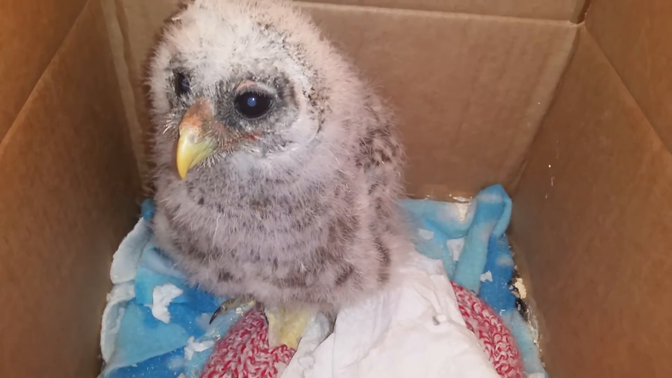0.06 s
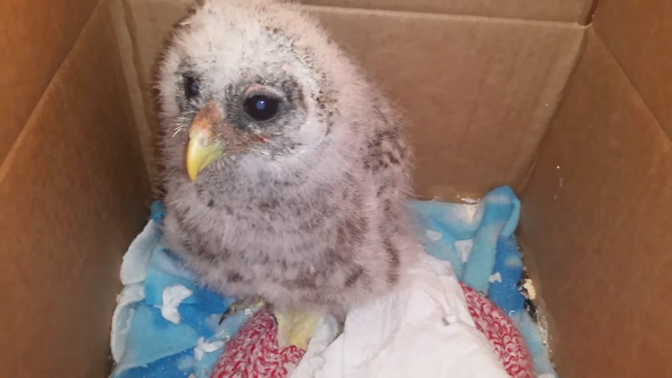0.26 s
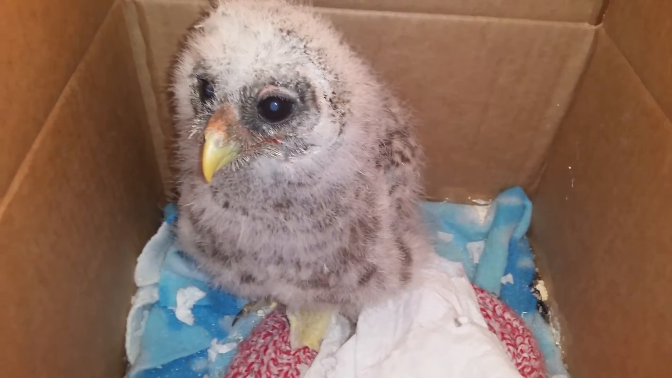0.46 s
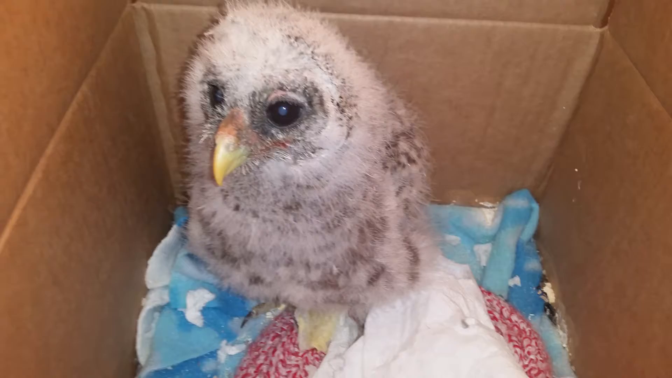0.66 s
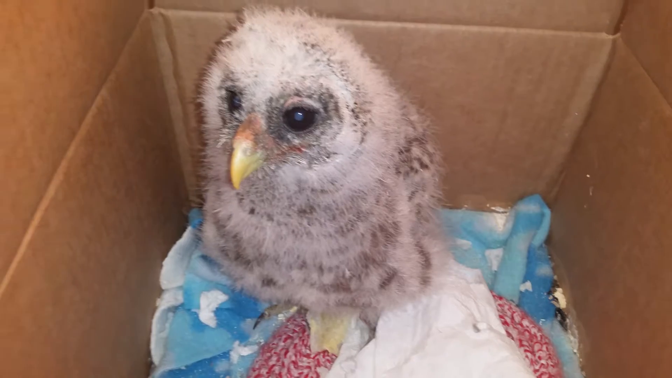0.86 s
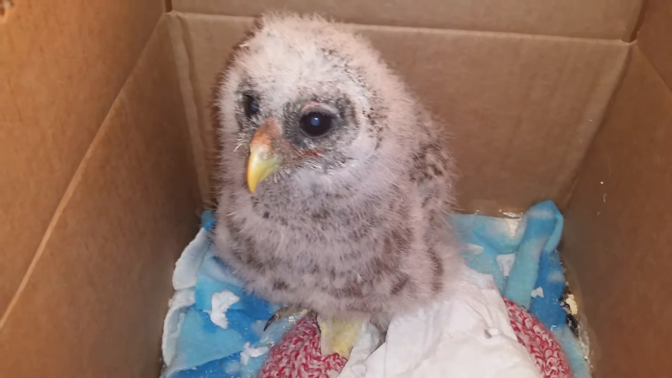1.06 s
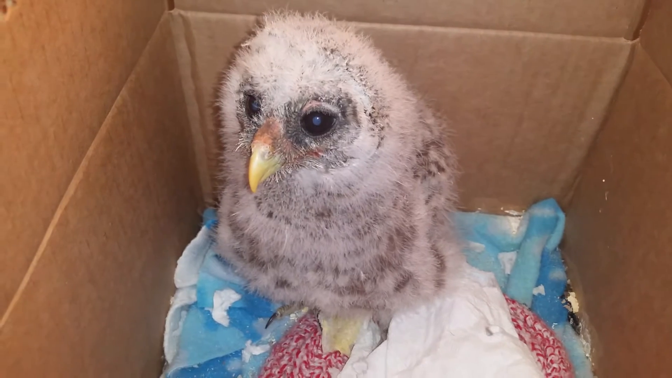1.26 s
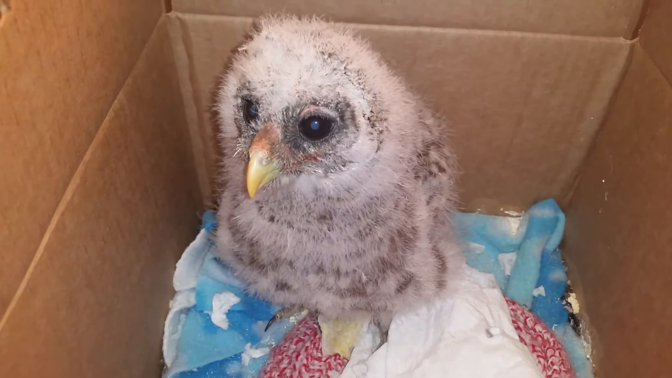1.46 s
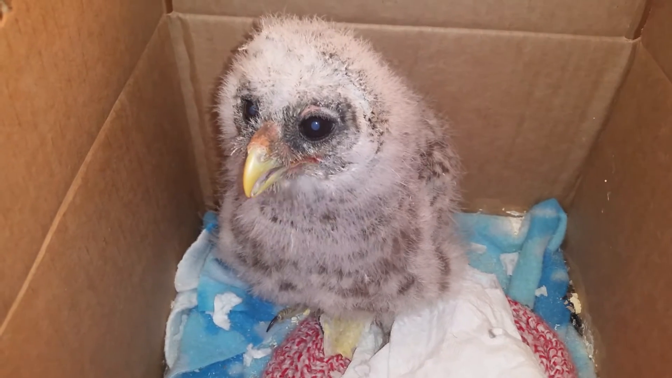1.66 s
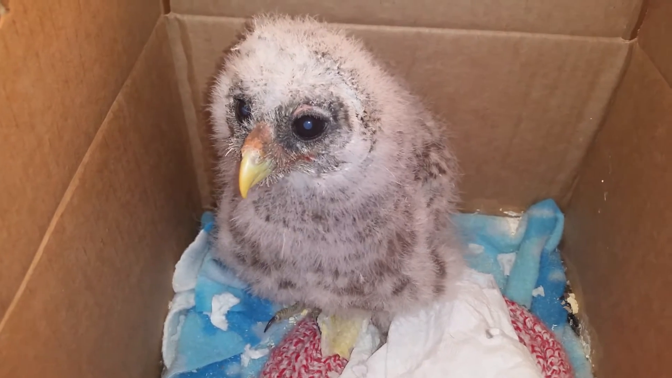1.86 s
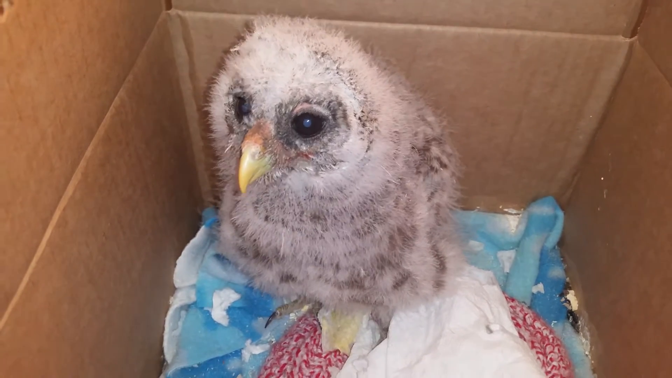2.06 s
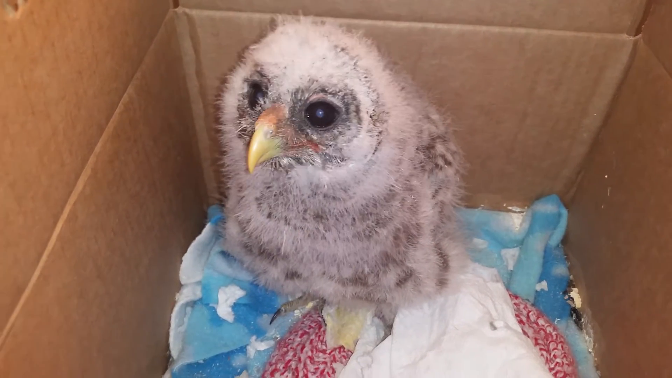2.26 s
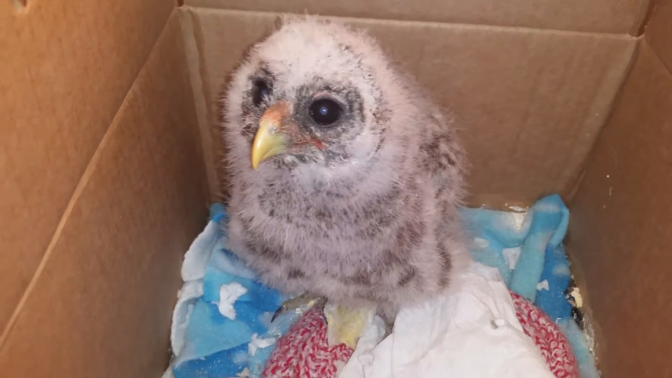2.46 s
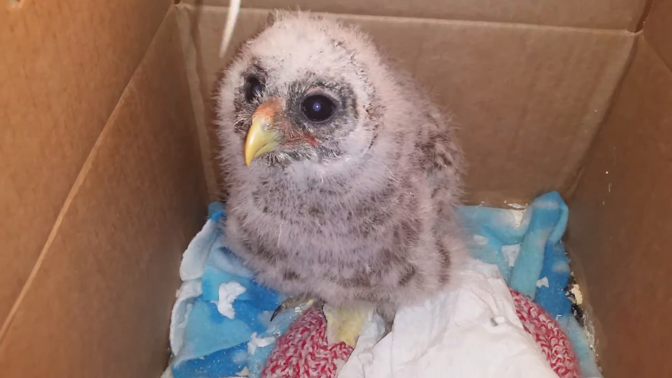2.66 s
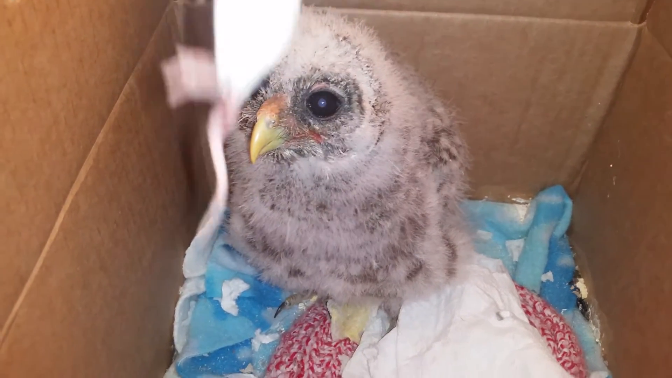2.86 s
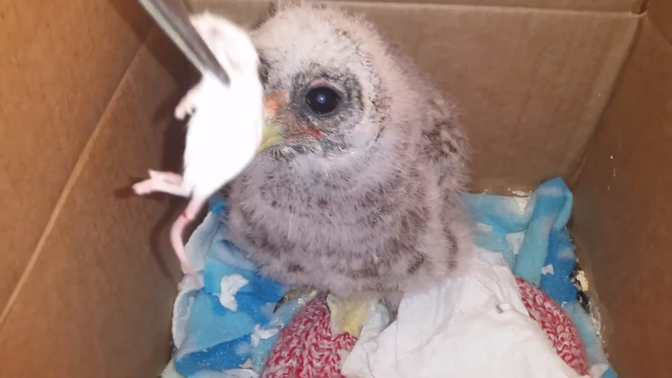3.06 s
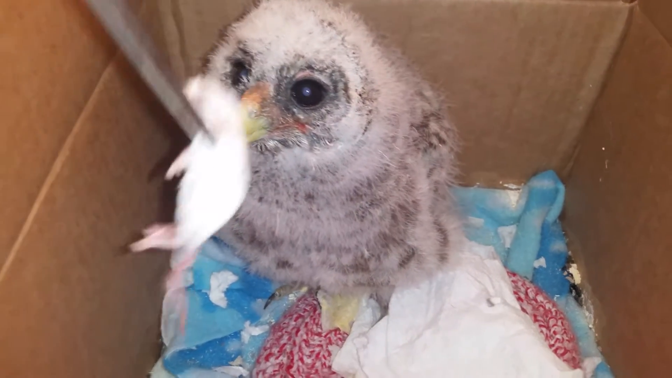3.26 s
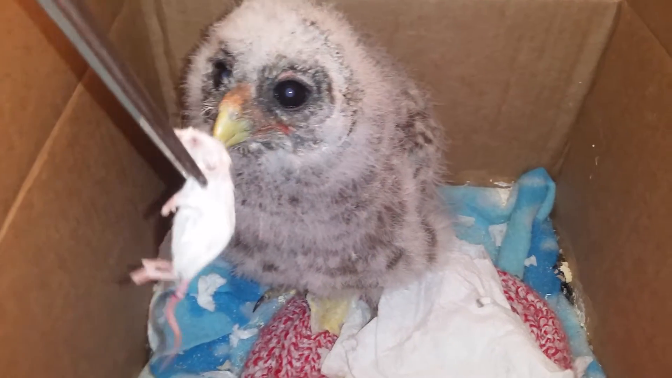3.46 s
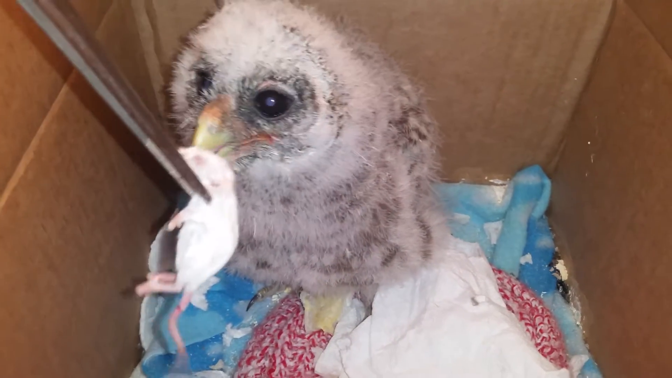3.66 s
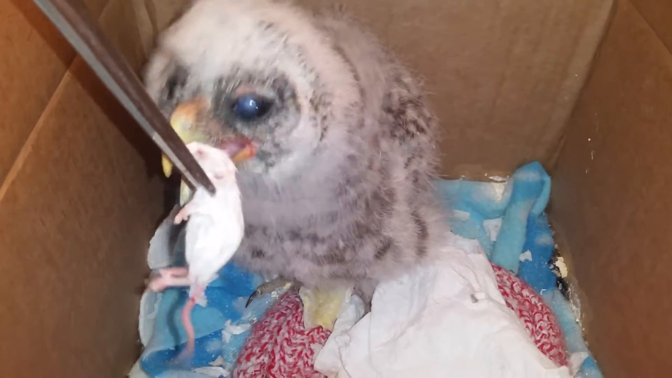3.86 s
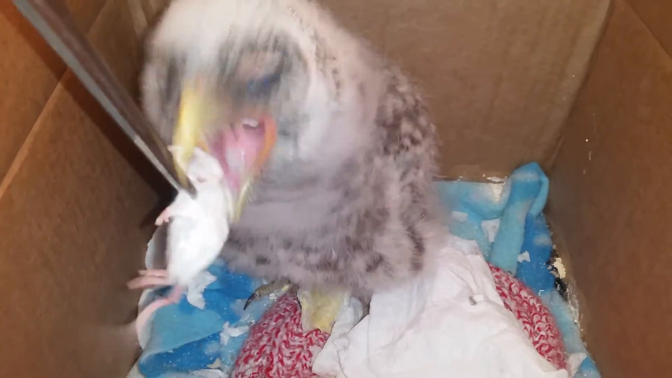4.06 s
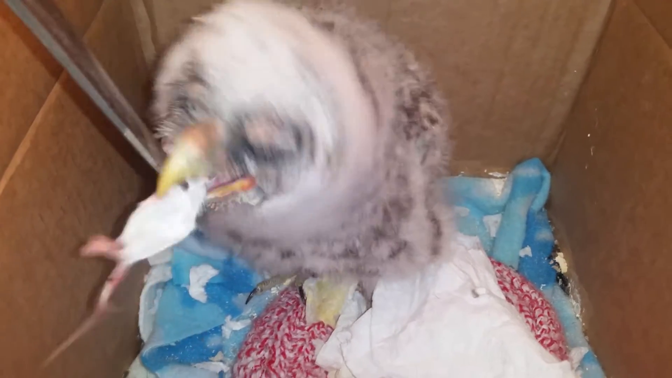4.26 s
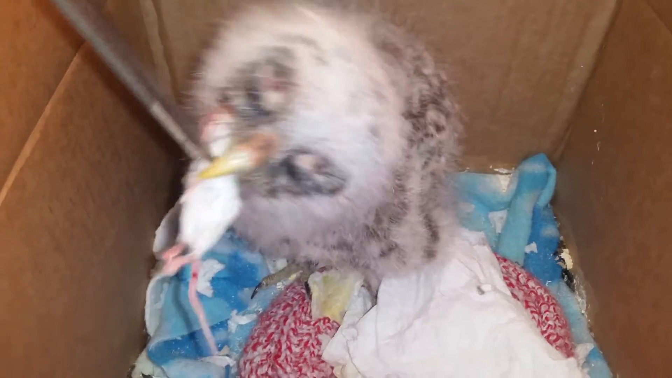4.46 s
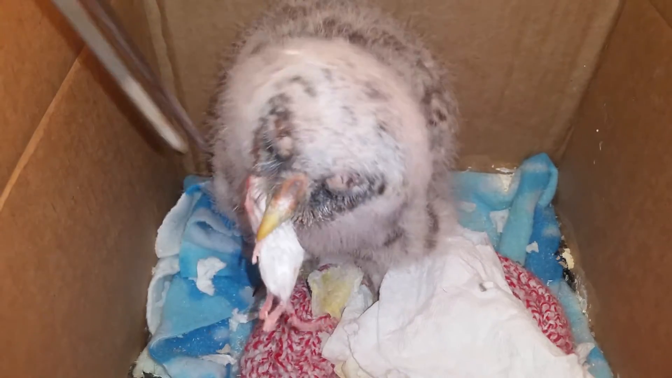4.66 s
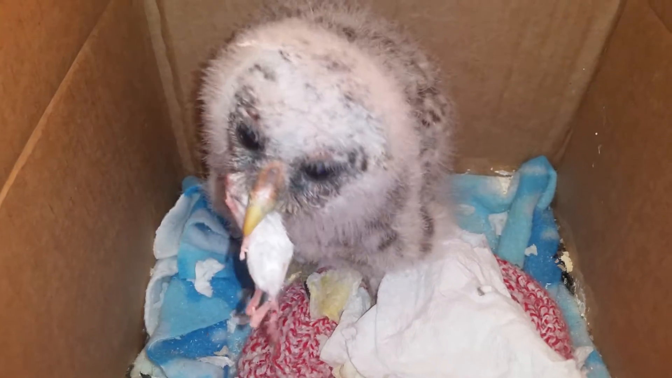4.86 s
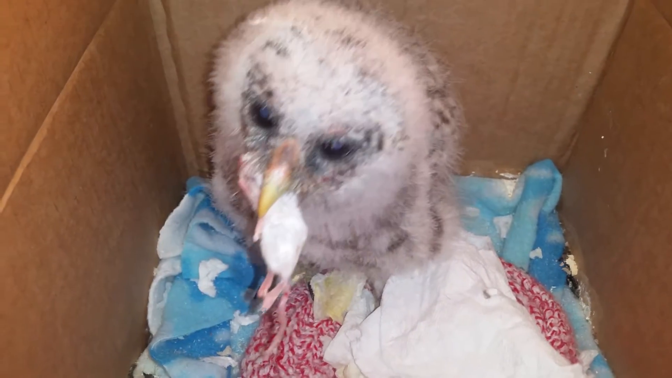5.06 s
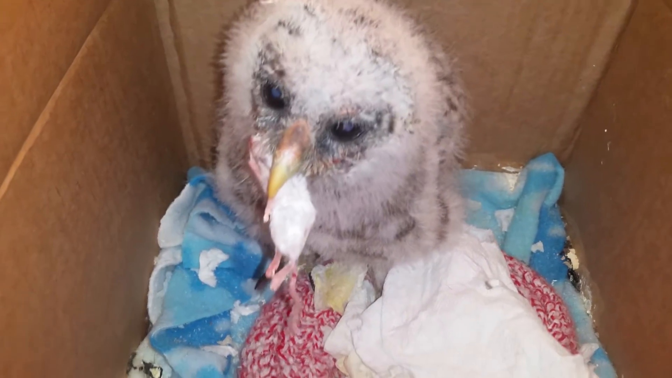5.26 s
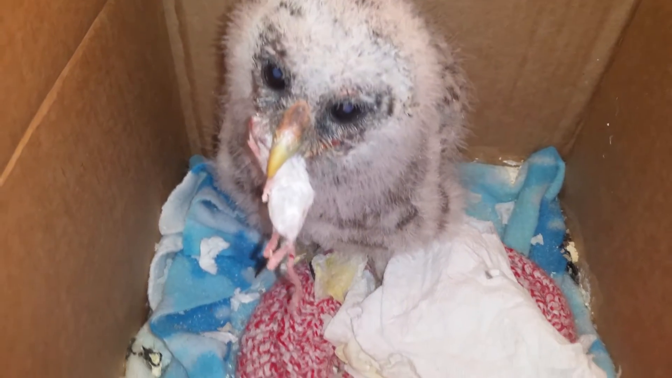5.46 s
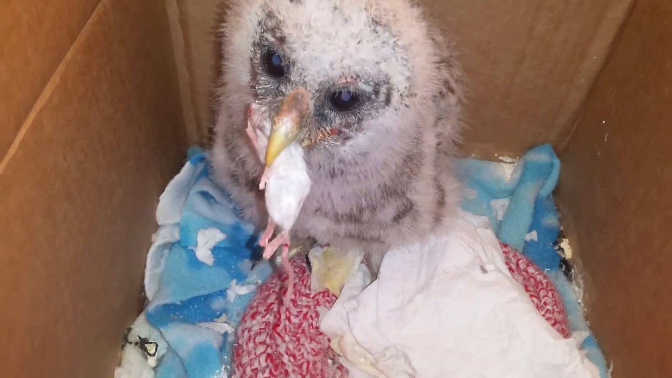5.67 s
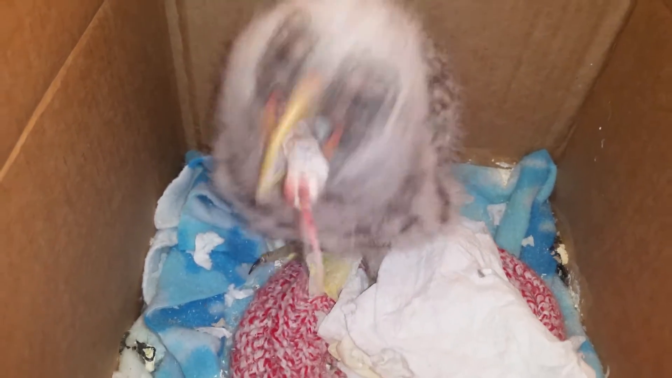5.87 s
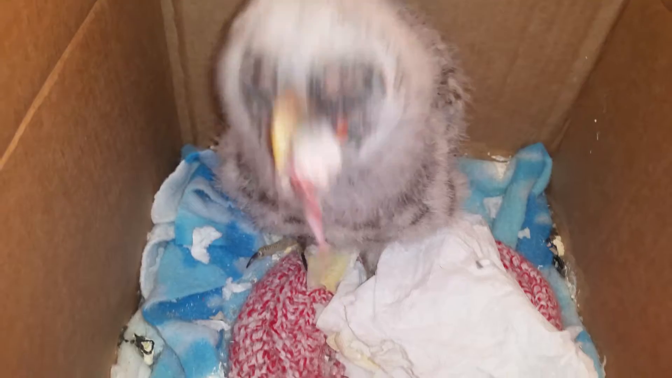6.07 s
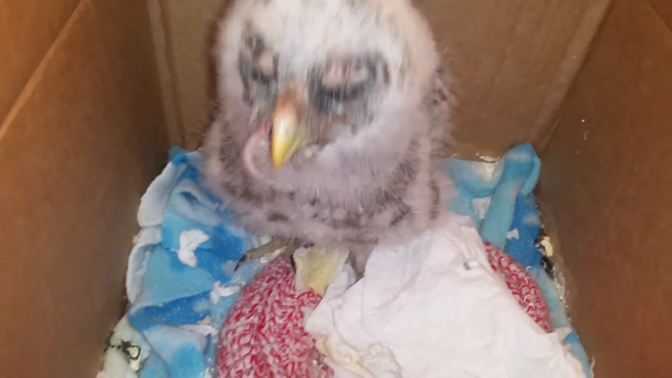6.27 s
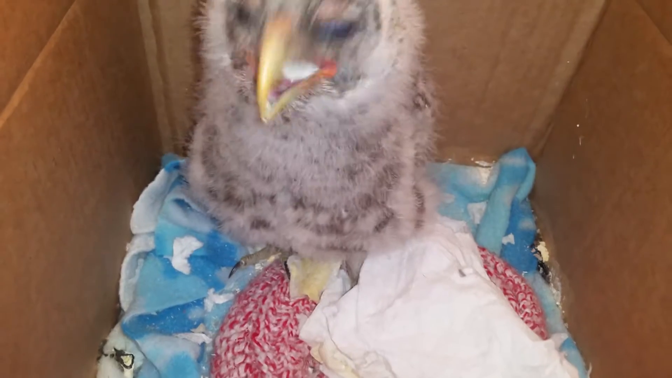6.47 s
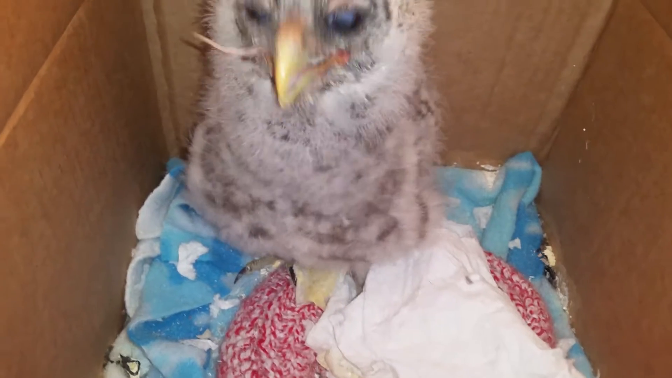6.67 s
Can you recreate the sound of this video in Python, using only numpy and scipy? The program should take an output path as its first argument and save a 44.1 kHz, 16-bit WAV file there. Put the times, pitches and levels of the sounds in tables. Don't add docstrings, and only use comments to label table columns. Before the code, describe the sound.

Close in a cardboard box, a young owl gives one weak wheezy whistle and one loud tearing shriek, with dull thuds, rustles and ticks.

```python
import sys
import numpy as np
from scipy import signal
from scipy.fft import rfft, irfft, next_fast_len
from scipy.io import wavfile
from scipy.ndimage import uniform_filter1d

SR = 44100
rng = np.random.default_rng(int(sys.argv[2]) if len(sys.argv) > 2 else 0)


def transcribe(signal):
    frames = np.atleast_2d(signal).T
    limited = np.clip(frames, -1, 1)
    pcm = np.round(limited * 32767).astype(np.int16)
    wavfile.write(sys.argv[1], SR, pcm)


def voltage_ratio(decibels):
    exponent = np.asarray(decibels, float) / 20
    return 10 ** exponent


N = 296087
T = np.arange(N) / SR
M = next_fast_len(N)
HZ = np.maximum(np.arange(M // 2 + 1) * SR / M, 1)
PORT_LAG_S = 5.6 / 44100


def unit(x):
    return x / np.sqrt(np.mean(np.abs(x) ** 2))


def pan(left_minus_right_db):
    return voltage_ratio(np.array([[left_minus_right_db], [-left_minus_right_db]]) / 2)


def curve(rows, fade_s=.004):
    s, *columns = np.transpose(rows)
    on = np.clip(np.minimum(T - s[0], s[-1] - T) / fade_s + 1, 0, 1)
    return [np.interp(T, s, c) for c in columns], on


def walk(rate):
    k = int(SR / rate)
    return unit(uniform_filter1d(uniform_filter1d(rng.standard_normal(N), k), k))


def colour(x, table, lo_hz=1, hi_hz=30000):
    hz, *db = np.transpose(table)
    gain = voltage_ratio(np.array([np.interp(np.log(HZ), np.log(hz), d) for d in db]))
    band = 1 / np.sqrt((1 + (lo_hz / HZ) ** 12) * (1 + (HZ / hi_hz) ** 12))
    return irfft(rfft(x, M) * gain * band, M)[..., :N]


def ports(alike_hz, lag_s=0., most=0.21):
    common = rfft(rng.standard_normal(N), M)
    own = rfft(rng.standard_normal((2, N)), M)
    alike = min(most, 1) / (1 + (HZ / alike_hz) ** 2)
    late = np.exp(-2j * np.pi * HZ * lag_s * np.array([[0], [1]]))
    return irfft(np.sqrt(alike) * common * late + np.sqrt(1 - alike) * own, M)[:, :N]


def streaks(x, depth_db, hold_s):
    _, _, z = signal.stft(x, nperseg=256)
    field = uniform_filter1d(rng.standard_normal(z.shape[1:]), int(hold_s * SR / 128), axis=1)
    return signal.istft(z * voltage_ratio(depth_db * unit(field)), nperseg=256)[1][:, :N]


def membrane(rows, lead, rough, jitter_hz, chaos_hz, chaos_db=0.):
    (hz, db, pan_db), on = curve(rows, 0.0022)
    chaos = unit(walk(chaos_hz) + 1j * walk(chaos_hz))
    beat = np.sqrt(1 - rough) + np.sqrt(rough) * voltage_ratio(chaos_db) * chaos
    phasor = on * beat * np.exp(2j * np.pi * np.cumsum(hz + jitter_hz * walk(148.0)) / SR)
    port = np.array([[.5], [-.5]])
    return phasor, np.sqrt(2) * voltage_ratio(db + port * pan_db + 1.06) * np.exp(1j * port * lead)


def times(z, k):
    return np.exp(1j * k * np.angle(z))


# (time [s], pitch [Hz], level [dB], left minus right [dB])
LOW_MEMBRANE = [
    [(1.83, 3850, -50.5, -14), (1.85, 4390, -48, -8), (1.88, 4690, -49, -4), (1.94, 4550, -47.5, -5),
     (2.005, 4590, -40.5, -5), (2.045, 4640, -48.5, -9), (2.17, 4640, -46.5, -2), (2.3, 4640, -59, 7),
     (2.585, 4620, -67, 23)],
    [(4.2155, 4116, -19, 4), (4.228, 4234, -23.5, 7), (4.245, 4300, -22, -5), (4.262, 4330, -23, 9),
     (4.28, 4394, -30.5, 16), (4.3, 4394, -18.5, 8), (4.32, 4120, -22, 1), (4.338, 4030, -19, -1)],
    [(4.37, 4070, -19.5, 1), (4.39, 4245, -17, -4.5), (4.41, 4184, -19.5, -6), (4.43, 4224, -21, -3),
     (4.455, 4202, -18, -9), (4.476, 4280, -16, -11), (4.495, 4143, -16.5, -10), (4.512, 4270, -16.5, -7.5)],
    [(4.535, 4777, -35.5, -8.5), (4.65, 4760, -35, 12), (4.72, 4850, -33, 5.5), (4.76, 5030, -30.5, 2),
     (4.8, 4920, -32.5, 4), (4.9, 4980, -33.5, 3), (4.945, 4620, -31.5, 3.5), (4.97, 4170, -38.5, -2.5)],
]
# (time [s], pitch [Hz], level [dB], left minus right [dB])
HIGH_IN_FIRST = [
    [(1.85, 5600, -58, -4), (1.878, 5820, -53, -9), (1.926, 5630, -45.5, -2), (2.014, 5650, -38, 1.5),
     (2.086, 5560, -47, 4), (2.13, 5640, -42, 1), (2.21, 5496, -46.5, 4)],
    [(2.23, 5500, -47, 6), (2.27, 5610, -39.5, -3), (2.3, 5630, -42.5, 3), (2.358, 5680, -38.5, 0),
     (2.396, 5810, -38.5, 3), (2.412, 5735, -37.5, -1), (2.558, 5580, -44, 0.5), (2.58, 5390, -51, -1.0),
     (2.592, 5260, -50, 1)],
]
# (time [s], pitch [Hz], level [dB], left minus right [dB])
HIGH_IN_SECOND = [
    [(4.23, 5470, -36, 4), (4.27, 5600, -39, 21), (4.335, 5324, -32.5, 19), (4.37, 5346, -31, 11),
     (4.405, 5470, -33, 20), (4.432, 5260, -39, 10), (4.48, 5380, -27, 13), (4.52, 5370, -32.5, 17)],
    [(4.56, 5340, -33.5, 18.5), (4.62, 5476, -27, 19.5), (4.67, 5910, -28, 16), (4.705, 5986, -32, 19.5),
     (4.725, 5890, -35, 17), (4.76, 5935, -31, 11), (4.8, 5960, -24, 6.5)],
    [(4.822, 6050, -23, 1), (4.84, 6120, -28, 3), (4.86, 6130, -28, 2), (4.885, 6146, -25, 7.5),
     (4.907, 6250, -22, 4.5), (4.928, 6156, -25, 12), (4.935, 5890, -33, 9), (4.95, 5690, -33.5, 5),
     (4.966, 5100, -34, 1)],
]
# (time [s], pitch [Hz], level [dB], left minus right [dB])
SIDE_MEMBRANES = [
    [(4.231, 4490, -29.5, 12), (4.26, 4685, -34, 11), (4.3, 4580, -34, 16), (4.35, 4396, -24.5, -1),
     (4.38, 4430, -26, -1), (4.43, 4540, -29, -1), (4.465, 4500, -30, 1)],
    [(4.64, 6000, -40, 7), (4.67, 6640, -32.5, 6), (4.71, 6600, -30.5, 7), (4.745, 6460, -29.5, 4),
     (4.83, 6640, -34.5, 6), (4.845, 6680, -34, -2)],
    [(2.602, 9650, -51, -1), (2.624, 8650, -48, 17), (2.642, 7840, -66, 12)],
    [(4.522, 4350, -24, -5), (4.545, 4326, -26, -1), (4.63, 4330, -36, 6)],
    [(4.2045, 4250, -32, 10), (4.208, 4200, -36, 4), (4.2115, 4300, -33, 13)],
    [(4.7, 1060, -57.5, 1), (4.88, 1055, -41.5, 4), (4.955, 1096, -52.5, 2)],
    [(2.592, 5240, -54, -4), (2.608, 4750, -57, -8), (2.63, 4300, -56, -12), (2.646, 3900, -58, -14)],
    [(2.608, 4100, -55, -13), (2.634, 3800, -56, -10)],
    [(4.925, 4990, -40, 4), (4.948, 5180, -28, 5), (4.96, 4630, -31, 4)],
    [(4.85, 6660, -33, 5), (4.92, 6600, -35, 0)],
    [(4.52, 6000, -39, 7), (4.63, 5915, -46, 5)],
    [(4.51, 2800, -38, 3), (4.69, 2780, -47, -12)],
    [(1.86, 3500, -53.5, -9), (1.99, 3620, -47, -5), (2.26, 3630, -55, -5)],
    [(1.86, 3990, -46, -5), (2.1, 4050, -57, 0), (2.56, 3880, -57, 3)],
]
FLUTTER, WHISTLE, SQUEAK, UNDERTONE, CATCH, GROWL = SIDE_MEMBRANES[:6]
GLIDES, HOARSE = SIDE_MEMBRANES[6:9], SIDE_MEMBRANES[9:]
# (time [s], roughness [0-1])
ROUGHNESS = [
    [(1.83, .02), (1.9, .16), (2.03, .18), (2.2, .3), (2.3, .85), (2.57, .85), (2.6, .05)],
    [(4.51, .003), (4.53, .2), (4.62, .55), (4.7, .5), (4.76, .4), (4.79, .88), (4.93, .9), (4.95, .3)],
]
# (time [s], left lead of the low membrane [rad], of the high one [rad])
HEAD_TURNS = [
    [(1.9, 1.3, .3), (2.2, 1.3, .1), (2.27, 0., 0.), (2.45, .1, -.2), (2.55, 3., .2)],
    [(4.21, .9, .5), (4.26, -.2, 1.2), (4.34, 1.2, -1.2), (4.4, .1, -1.3), (4.5, .6, -1.6),
     (4.535, -1.2, -2.5), (4.62, -1.2, -5.2), (4.74, -1.2, -4.1), (4.9, -1.2, -1.6)],
]
BEAT_SLIPS = [4.4685, 4.482, 4.5113, 4.5165]


def screech(k):
    rough = np.clip(curve(ROUGHNESS[k])[0][0], 0, 1)
    low_lead, high_lead = curve(HEAD_TURNS[k])[0]
    low_rows = (LOW_MEMBRANE[0], LOW_MEMBRANE[1] + LOW_MEMBRANE[2] + LOW_MEMBRANE[3])[k]
    high_rows = (HIGH_IN_FIRST[0] + HIGH_IN_FIRST[1],
                 HIGH_IN_SECOND[0] + HIGH_IN_SECOND[1] + HIGH_IN_SECOND[2])[k]
    low, low_gain = membrane(low_rows, low_lead, rough, jitter_hz=9.47,
                             chaos_hz=(600, 750)[k], chaos_db=(2, 3)[k])
    high, high_gain = membrane(high_rows, high_lead, (.06, .006)[k] + 0.1 * rough,
                               jitter_hz=(16, 11)[k], chaos_hz=503)
    flutter, flutter_gain = membrane(FLUTTER, low_lead, 0.0078, jitter_hz=14, chaos_hz=300)
    for s in BEAT_SLIPS:
        low = low * np.tanh((T - s) / .0008)
    mirror = voltage_ratio(-11.5) * times(low, 2) * np.conj(flutter)
    mirror = mirror + voltage_ratio(-17.0) * flutter * times(flutter, 1) * np.conj(times(low, 1))
    voice = low * low_gain + high * high_gain
    voice = voice + k * flutter_gain * (flutter + mirror)
    voice = voice + mixing(k, rough, (low, high, flutter), (low_gain, high_gain, flutter_gain))
    return voice.real + throat_air(k, rough)


MIX_ORDERS = [(-1, 1, 0), (2, -1, 0), (-1, 2, 0), (2, 0, 0), (1, 1, 0), (0, 2, 0), (-2, 2, 0), (-1, 3, 0),
              (0, 1, -1), (1, -1, 1), (0, 2, -1), (1, 0, 1), (0, 0, 2), (0, 1, 1), (0, 3, -1), (-1, 0, 3),
              (1, 2, -2), (3, -1, -1)]
# (first screech [dB], clear cry [dB], torn cry [dB], left minus right [dB])
MIX_LEVELS = [(-24, -39.5, -39.5, -1), (-26, -29, -23.5, -9), (-20, -37.5, -26, 9), (-28, -34, -31, 10.5),
              (-20, -30.5, -32, -7), (-19, -26, -30, 0), (-51, -43, -40, 2), (-40, -45, -40.5, -7),
              (0, -42, -29, 2), (0, -24.5, -30, -1), (0, -33, -23, 9), (0, -35, -30, 2), (0, -23, -31, 2),
              (0, -24, -32, 9), (0, -37, -29, -4), (0, -36, -32.5, -3), (0, -28, -28, 6),
              (0, -42, -32.5, 8)]


def mixing(k, rough, voices, gains):
    out, torn = 0, np.clip(4 * rough, 0, 1)
    efforts = [np.log(np.abs(g).max(axis=0)) for g in gains]
    for orders, (first_db, clear_db, torn_db, pan_db) in zip(MIX_ORDERS, MIX_LEVELS):
        if orders[2] and not k:
            continue
        used = [(n, z, e) for n, z, e in zip(orders, voices, efforts) if n]
        effort = np.exp(sum(abs(n) * e for n, z, e in used) / np.abs(orders).sum())
        effort = effort * (1 - 0.3 * rough * bool(orders[0]))
        tone = np.prod([np.abs(z) * times(z, n) for n, z, e in used], axis=0)
        db = clear_db + torn * (torn_db - clear_db) if k else first_db
        turn = np.array([[1], [np.exp(-1j * (orders[0] + orders[2]))]])
        out = out + effort * voltage_ratio(db + 2.4 * walk(35.3)) * tone * pan(pan_db) * turn
    return out


# (frequency [Hz], left [dB], right [dB])
THROAT_HISS = [
    [(3760, -97, -108), (5070, -81, -87), (6230, -99, -106), (6600, -71, -83), (7070, -77, -72),
     (7300, -70, -100), (9240, -65, -70), (9650, -76, -84), (10330, -93, -67.5), (11500, -71, -77),
     (12100, -86, -83), (12200, -81, -66.5), (14100, -91, -83), (15300, -74, -72.5),
     (16500, -101.0, -101.0)],
    [(3700, -54.5, -78.5), (4350, -83, -56.5), (5180, -58, -70), (6000, -62.5, -74), (6600, -75, -86),
     (7140, -69.5, -94), (8900, -67.5, -72.5), (10100, -101, -64), (10600, -70, -64.5), (12150, -76, -58),
     (13400, -79, -68), (14350, -81, -80), (15050, -73.5, -71), (15460, -83.5, -90)],
]
# (frequency [Hz], left [dB], right [dB])
LOW_RASP = [
    [(500, -94, -92), (1060, -70, -73), (1280, -80, -84), (1810, -82.5, -91), (2100, -90, -77.5),
     (2900, -81, -85.5), (3470, -72.5, -70), (4100, -83, -74.5)],
    [(513, -71.5, -74), (1080, -64, -67.5), (1340, -75.5, -71.5), (1700, -70, -77), (2350, -67.5, -59),
     (2360, -86, -82.5), (3170, -82.5, -56.5), (3750, -78, -56)],
]
# (frequency [Hz], left [dB], right [dB])
AIR_LEAK = [(11800, -40, -40), (12300, -.7, -.7), (13300, -.7, -.7), (13700, -40, -40)]


def throat_air(k, rough):
    hiss, rasp = breath(k)
    air = streaks(ports(30000, PORT_LAG_S, most=.9), depth_db=(2.9, 4.2)[k], hold_s=(.16, .09)[k])
    air = air * voltage_ratio(0.5 * walk(300))
    dull = k * np.clip(1.25 - rough, 0, 1) * colour(colour(air, THROAT_HISS[k]), AIR_LEAK)
    upper = colour(air, THROAT_HISS[k], lo_hz=3600) - dull
    upper = upper / np.std(colour(air, THROAT_HISS[k], lo_hz=7000))
    lower = unit(colour(air, LOW_RASP[k], 310, 5010))
    return voltage_ratio(-5.0) * (hiss * upper + rasp * lower)


# (start [s], end [s], level [dB], rise [s], low rasp re level [dB])
AIR_PUSHES = [
    [(1.835, 2.57, -41.5, 0.1, -2)],
    [(4.225, 4.478, -37, 0.075, -6), (4.507, 4.958, -32.5, 0.004, 1.5)],
]
SWELL_DB_PER_S, RELEASE_SHARE = 4, 0.32
RASP_SAG_DB_PER_S, RASP_RISE_SHARE = (-5, -2.5), 0.38


def breath(k):
    hiss = rasp = 0
    for start, end, db, rise_s, rasp_db in AIR_PUSHES[k]:
        since = np.clip(T - start, 0, end - start)
        push = voltage_ratio(db) * np.exp(-np.maximum(T - end, 0) / (RELEASE_SHARE * rise_s))
        hiss = hiss + push * voltage_ratio(SWELL_DB_PER_S * since) * (1 - np.exp(-since / rise_s))
        sag = voltage_ratio(rasp_db - RASP_SAG_DB_PER_S[k] * since)
        rasp = rasp + push * sag * (1 - np.exp(-since / (RASP_RISE_SHARE * rise_s)))
    return hiss, rasp


def whistle(*args, **settings):
    phasor, gain = membrane(*args, **settings)
    return phasor * gain


def side_membranes():
    top, top_gain = membrane(WHISTLE, -1.03, 0.029, jitter_hz=21.4, chaos_hz=509)
    out = (top + voltage_ratio(-20.5) * top ** 2) * top_gain
    beat = np.exp(2j * np.pi * 480 * T)
    squeak = whistle(SQUEAK, -1.05, 0.041, jitter_hz=24.6, chaos_hz=498)
    out = out + squeak * (1 + 0.24 * beat + 0.65 / beat)
    out = out + whistle(UNDERTONE, 0.41, 0.93, jitter_hz=31.5, chaos_hz=307)
    out = out + whistle(CATCH, 0.74, .002, jitter_hz=10.7, chaos_hz=500)
    out = out + whistle(GROWL, 0.35, 0.602, jitter_hz=30.54, chaos_hz=300)
    for rows in GLIDES:
        out = out + whistle(rows, 0.202, 0.2, jitter_hz=24.5, chaos_hz=404.6)
    for rows in HOARSE:
        out = out + whistle(rows, 1.66, 0.93, jitter_hz=25.1, chaos_hz=620)
    return out.real


# (time [s], peak [dB], pitch [Hz], t60 [s])
BOX_BUMPS = [(3.085, -37.5, 350, 0.021), (3.094, -30.5, 231, 0.06), (3.172, -38.5, 230, 0.067),
             (3.197, -35, 190, 0.041), (3.198, -42.5, 84, 0.22), (3.253, -37.5, 222, 0.11),
             (3.283, -43.5, 257, 0.034), (3.27, -40, 100, 0.06), (3.096, -48, 607, 0.046),
             (3.178, -43, 516, 0.031), (3.26, -47, 690, 0.035), (3.397, -41.5, 136, 0.11),
             (3.417, -44, 67, 0.049), (3.44, -41, 55.4, 0.082), (4.277, -43.5, 121, 0.17),
             (4.3, -40.5, 57, 0.16), (4.53, -39, 51.7, 0.25), (4.485, -35.5, 111, 0.12),
             (4.843, -33.5, 235.8, 0.16), (4.859, -33.5, 131.7, 0.23), (5.224, -41.5, 125, 0.39),
             (5.466, -31, 94.3, 0.099), (6.327, -39, 139, 0.04), (6.347, -38.5, 128, 0.035),
             (6.478, -52, 119, 0.062), (6.555, -32, 135, 0.035), (6.563, -33, 61, 0.033),
             (6.597, -38, 60.5, 0.045)]
# (time [s], peak [dB], pitch [Hz], t60 [s])
EXTRA_KNOCK = (4.848, -31, 580, .045)
PANEL_MODES = [(0.999, 1), (2.6, 0.11), (4.3, 0.046)]
PUSH_CYCLES = 0.5


def bumps():
    out, t = np.zeros((2, N + SR)), T[:SR // 8]
    for s, db, hz, t60 in [*BOX_BUMPS, EXTRA_KNOCK]:
        fall = np.exp(-np.log(1000) * t / max(t60, .005))
        push = 1 - np.exp(-t * hz / PUSH_CYCLES)
        lag = np.array([[0], [-45 / hz]])
        ring = push * sum(size * fall ** (m ** 0.13) * np.sin(2 * np.pi * m * hz * t + lag)
                          for m, size in PANEL_MODES)
        out[:, int(s * SR):][:, :len(t)] += voltage_ratio(db) * ring / np.abs(ring).max()
    return out[:, :N] * np.array([[.8], [1.15]])


# (time [s], peak [dB], centre [Hz], left minus right [dB])
BEAK_AND_CLAWS = [(0.2444, -67, 7000, 7), (0.401, -58, 3890, 25), (2.81, -51, 4300, 10.5),
                  (3.0874, -50, 6500, 4), (3.231, -53, 6460, 5), (5.37, -51, 4230, 15),
                  (5.465, -55, 1570, 1.5), (6.114, -62, 4390, 7), (6.146, -63, 5500, 2.5),
                  (6.152, -52, 1090, 3.5), (6.2635, -59, 6000, -2), (6.41, -57, 7500, 0),
                  (6.4827, -35.5, 4430, 6), (6.2385, -58, 3990, 2), (6.554, -41, 3880, 3),
                  (6.3463, -40, 3140, -5), (6.354, -42, 1060, 0), (6.603, -39, 5200, 2),
                  (6.482, -29, 2230, 14), (6.4893, -36, 2100, 1), (6.558, -38, 1600, -1),
                  (6.6152, -27, 4770, 4)]


def ticks():
    out, t = np.zeros((2, N + SR)), T[:1024]
    for s, db, hz, pan_db in BEAK_AND_CLAWS:
        crack = np.exp(-t * hz * .5) * (1 - np.exp(-t * hz * 3)) * np.sin(2 * np.pi * hz * t)
        b, a = signal.butter(2, [hz * .5, min(hz * 1.4, 20000)], "band", fs=SR)
        tail = signal.lfilter(b, a, rng.standard_normal(1024)) * np.exp(-t / 0.036)
        tick = crack / np.abs(crack).max() + 0.16 * tail
        out[:, int(s * SR):][:, :1024] += voltage_ratio(db) * pan(pan_db) * tick
    return out[:, :N]


# (frequency [Hz], left [dB], right [dB])
CLOTH_COLOUR = [(313, -78, -101), (750, -69, -66.5), (1006, -67.5, -78), (1600, -80, -75.5),
                (2320, -77, -76.5), (3500, -79, -79.5), (4640, -75, -80.5), (6700, -87, -92.5),
                (8420, -99.0, -96.5), (11570, -102.0, -96), (15600, -101.0, -99.0)]


def rustle():
    grains = ports(2400, PORT_LAG_S) * voltage_ratio(2.0 * walk(1000) + 2.0 * walk(27))
    scale = np.std(colour(grains, CLOTH_COLOUR, 846, 3800))
    body = colour(grains, CLOTH_COLOUR, 320, 4500)
    sheen = colour(grains, CLOTH_COLOUR, lo_hz=6000)
    press, slide = strokes()
    return (press * body + voltage_ratio(3.5) * slide * sheen) / scale


# (peak time [s], level [dB], rise [s], fall [s])
RUSTLE_STROKES = [(4.988, -64.5, 0.012, 0.15), (5.43, -54, 0.31, 0.012), (5.392, -57, .006, 0.007),
                  (5.477, -41, 0.016, 0.057), (5.6, -44, 0.085, 0.022), (6.36, -58.5, 0.083, 0.081),
                  (6.472, -55, 0.061, 0.12), (6.354, -46, 0.0062, 0.014), (6.379, -50, 0.0089, 0.0078),
                  (6.482, -39, 0.0012, 0.023), (6.559, -44.5, 0.019, 0.1), (6.657, -44.5, 0.051, 0.045),
                  (6.62, -63, .008, 0.027), (6.685, -65, .02, 0.052)]
SLIDE_S = 0.088


def strokes():
    s, db, rise_s, fall_s = np.transpose(RUSTLE_STROKES)[:, :, None]
    power = (voltage_ratio(db) * np.exp(-np.abs(T - s) / np.where(T < s, rise_s, fall_s))) ** 2
    sliding = np.minimum((rise_s + fall_s) / SLIDE_S, 1)
    return np.sqrt(power.sum(axis=0)), np.sqrt((power * sliding ** 2).sum(axis=0))


# (frequency [Hz], left [dB], right [dB])
ROOM_COLOUR = [(40, -84.5, -77.5), (127, -83, -79.5), (222, -88.5, -87.5), (704, -87, -90),
               (870, -92, -99.0), (1980, -108.0, -111.0), (2790, -113.0, -117.0), (3500, -106.0, -113.0),
               (4030, -91, -104.0), (5030, -99, -120.0), (6640, -123.0, -132.0), (8000, -133.0, -133.0),
               (12160, -128.0, -126.0), (15600, -120.0, -120.0)]
# (frequency [Hz], left [dB], right [dB])
AIR_COLOUR = [(6000, 8.5, -13.5), (8550, -4.5, -0.5), (16030, 3, 7)]
RUMBLE_DB, HISS_DB, AIR_DB = (-55, 5.5), (-63.5, 5.5), (-100, 36.5)  # (shut [dB], rise when open [dB])
SETTLE_S, SETTLE_DB = 0.015, 14.5
DRAG_DB = -1
CIRCUIT_DB = -80.5


def room():
    ajar = gate()
    rumble_db, hiss_db, air_db = (shut + rise * ajar for shut, rise in (RUMBLE_DB, HISS_DB, AIR_DB))
    settle = voltage_ratio(SETTLE_DB * np.exp(-T / SETTLE_S))
    noise = ports(620, most=0.78)
    rumble = unit(colour(noise, ROOM_COLOUR, 34, 272.3)) * voltage_ratio(2.0 * walk(11.7))
    rumble = rumble * np.hypot(voltage_ratio(rumble_db), voltage_ratio(DRAG_DB) * strokes()[0])
    tone = colour(noise, ROOM_COLOUR, 355, 2440) * voltage_ratio(1.12 * walk(8.3) - 1.5)
    hiss = colour(noise, ROOM_COLOUR, 3170, 5120)
    tone_and_hiss = (tone + hiss) / np.std(hiss) * voltage_ratio(hiss_db) * settle
    air = unit(colour(streaks(noise, depth_db=5.5, hold_s=0.048), AIR_COLOUR, lo_hz=5890))
    air = air * voltage_ratio(air_db + walk(23))
    circuit = voltage_ratio(CIRCUIT_DB) * unit(colour(noise, ROOM_COLOUR, lo_hz=9130))
    return rumble + tone_and_hiss + air + circuit


# (opens [s], starts closing [s], how far [0-1])
GATE_OPENINGS = [
    (0.214, 0.366, 0.37),
    (1.846, 2.763, 0.97),
    (2.74, 3.47, 0.72),
    (4.212, 5.227, 1.05),
    (5.24, 5.63, 1),
    (5.64, 6.3, 0.59),
    (6.28, 6.803, 0.74),
]
GATE_OPEN_S, GATE_CLOSE_S = 0.012, 0.13


def gate():
    opens, closes, far = np.transpose(GATE_OPENINGS)[:, :, None]
    opening = np.clip((T - opens) / GATE_OPEN_S + 1, 0, 1)
    closing = np.exp(-np.maximum(T - closes, 0) / GATE_CLOSE_S)
    return np.max(far * opening * closing, axis=0)


def scene():
    voice = screech(0) + screech(1) + side_membranes()
    return (voice + bumps() + ticks() + rustle() + room()) * np.minimum(T / .001, 1)


def band_limit(x):
    return signal.sosfilt(signal.butter(12, 15850, fs=SR, output="sos"), x)


def record(dry):
    top_cut = signal.ellip(10, .3, 80, 15800, fs=SR, output="sos")
    mix = signal.sosfilt(top_cut, dry)
    return band_limit(mix)


dry = scene()
out = record(dry)
transcribe(out)
```